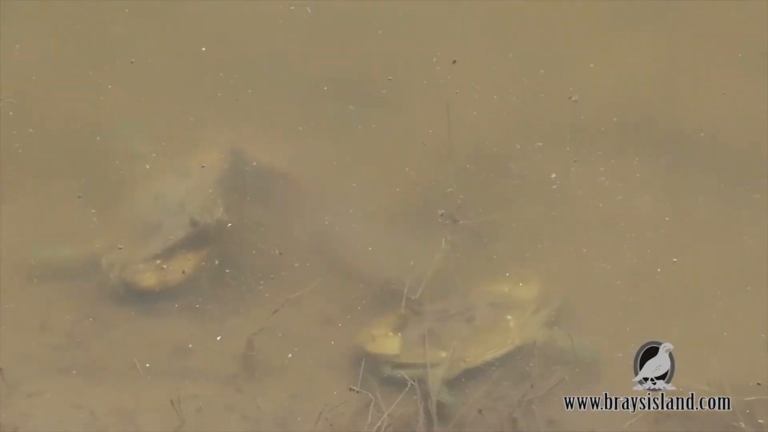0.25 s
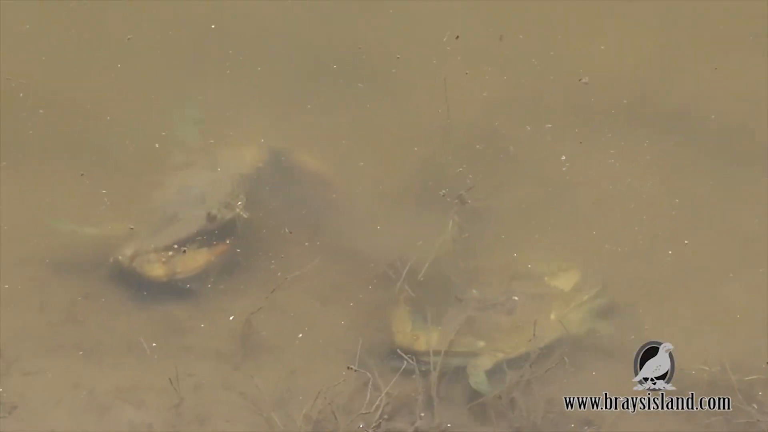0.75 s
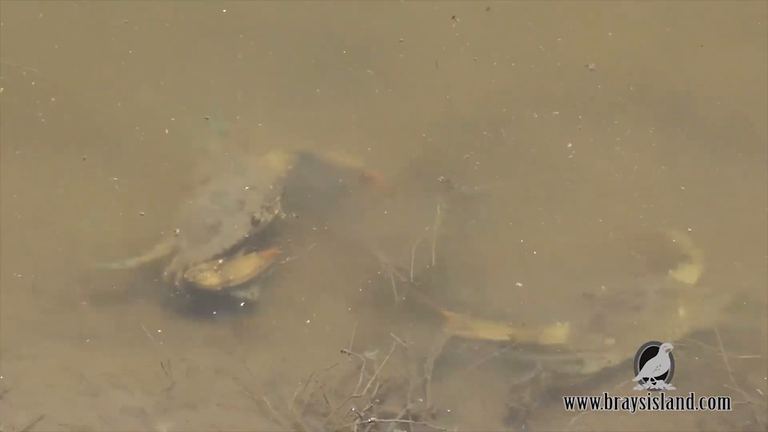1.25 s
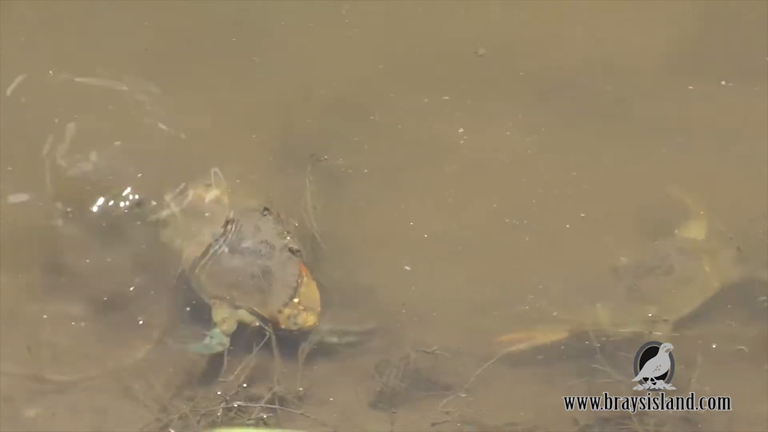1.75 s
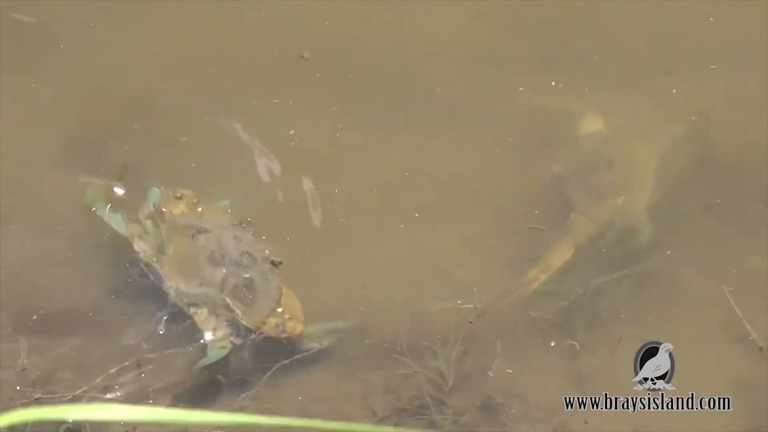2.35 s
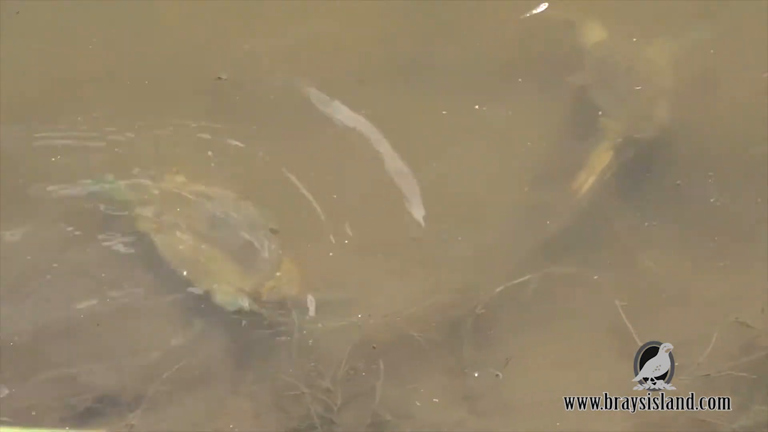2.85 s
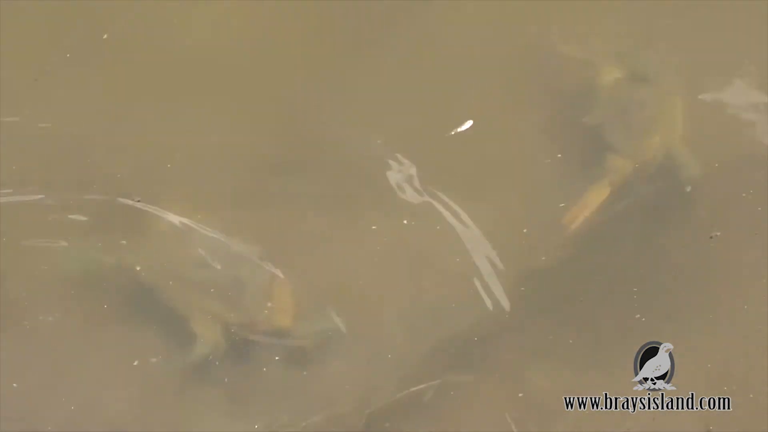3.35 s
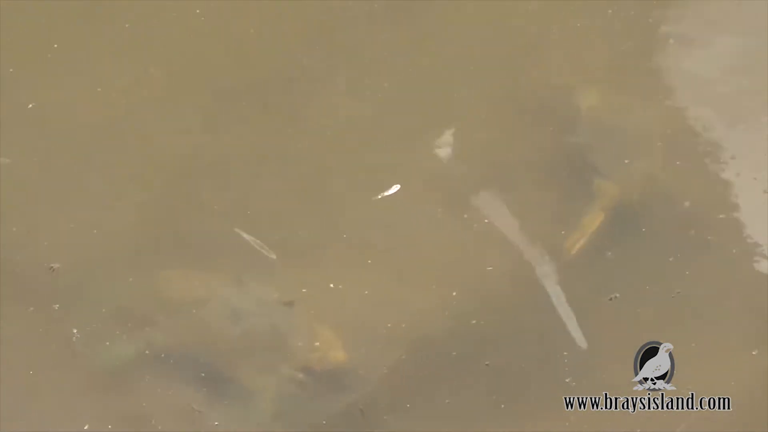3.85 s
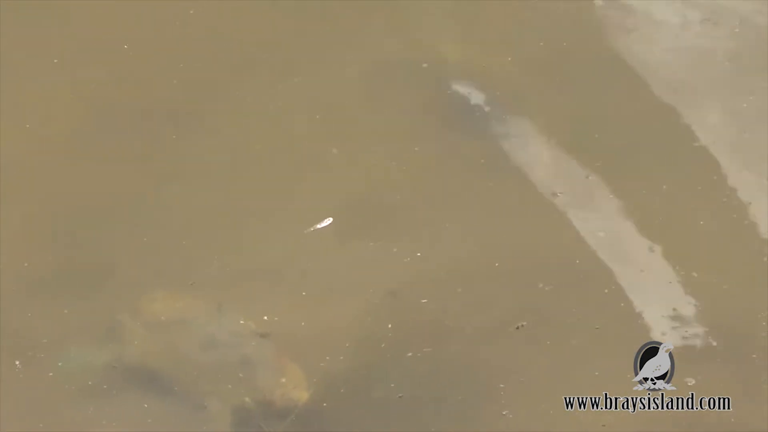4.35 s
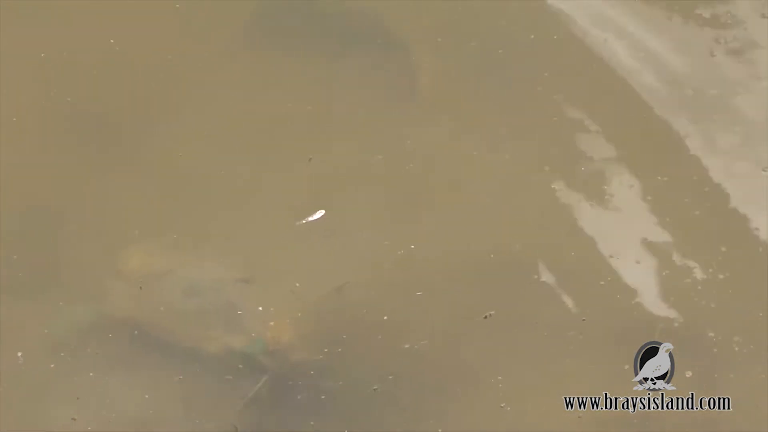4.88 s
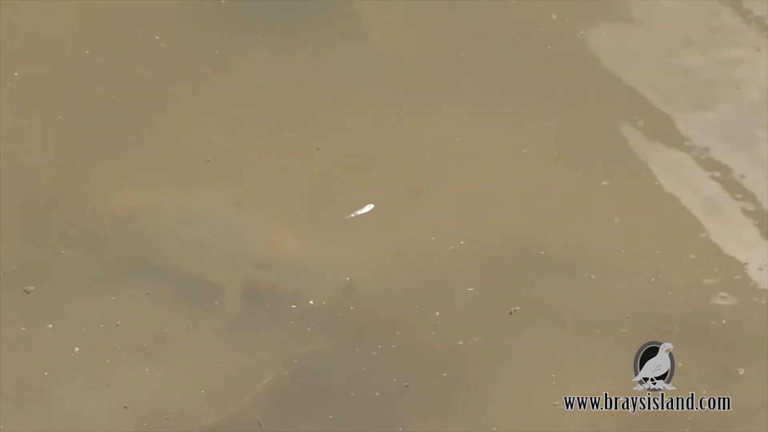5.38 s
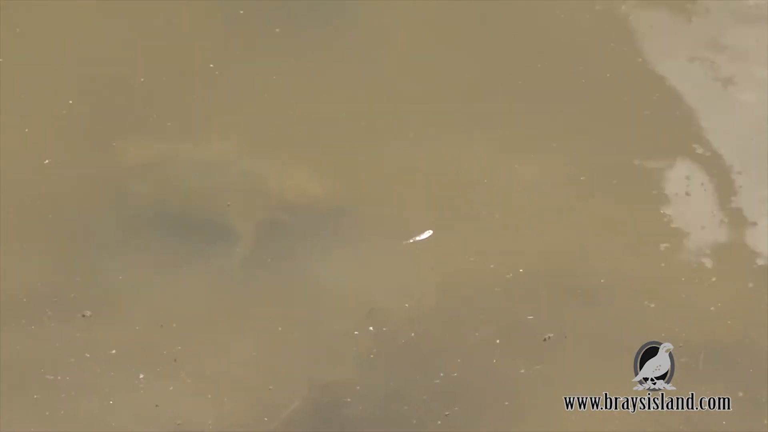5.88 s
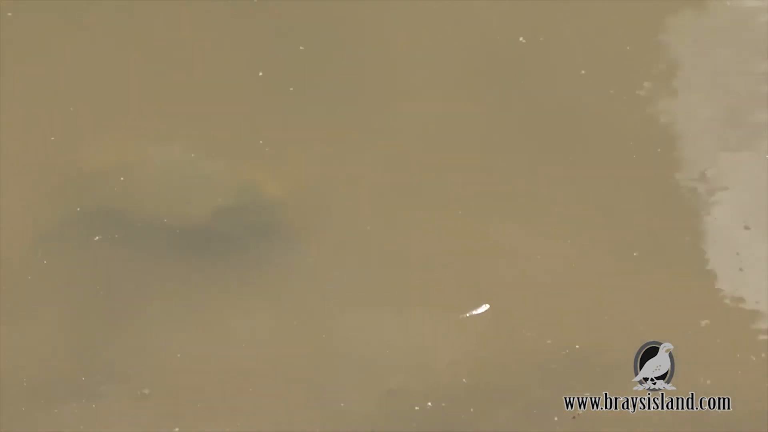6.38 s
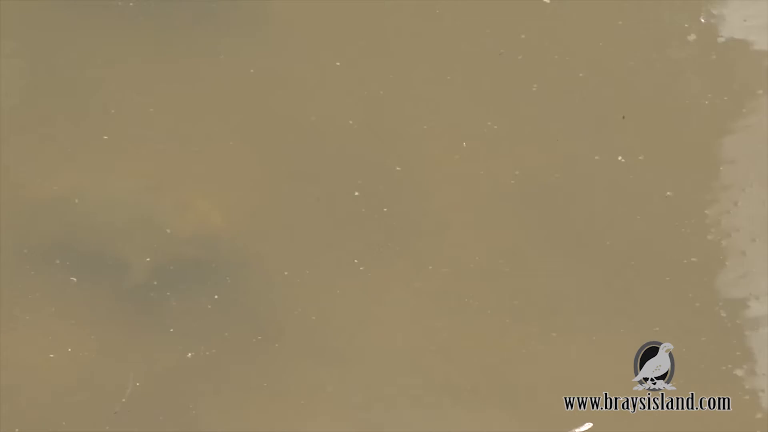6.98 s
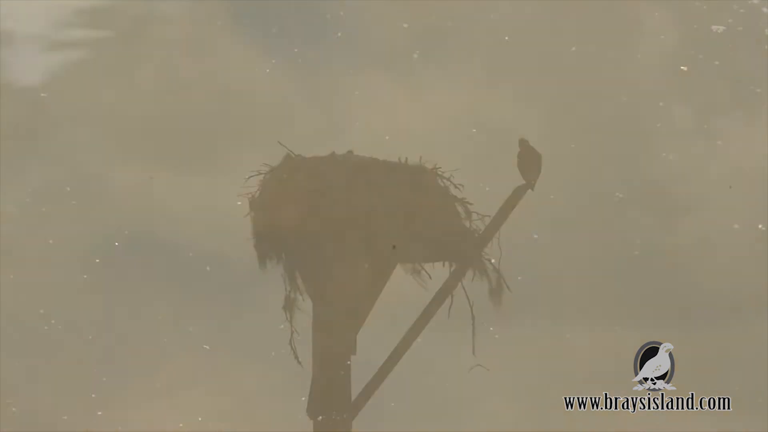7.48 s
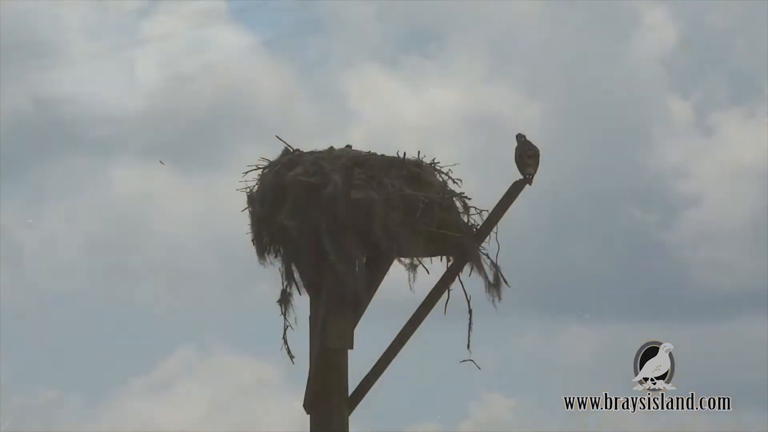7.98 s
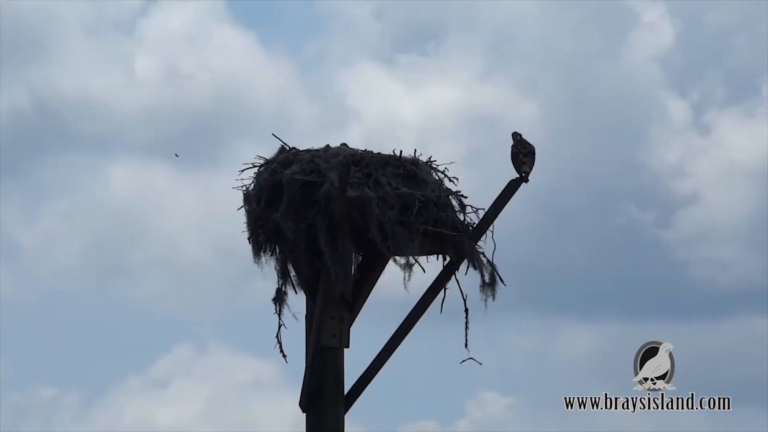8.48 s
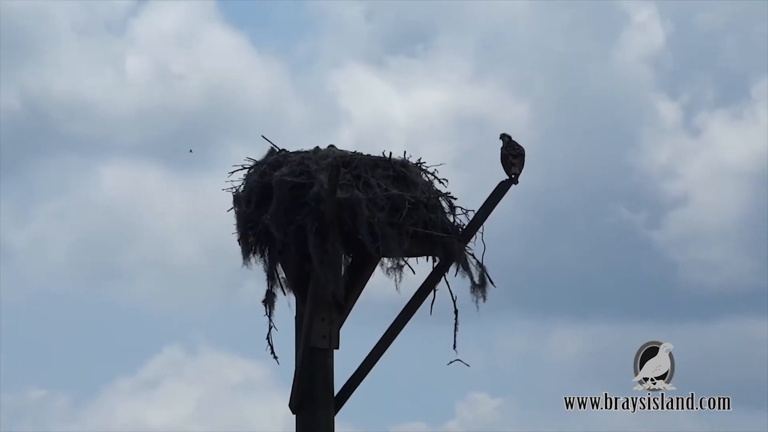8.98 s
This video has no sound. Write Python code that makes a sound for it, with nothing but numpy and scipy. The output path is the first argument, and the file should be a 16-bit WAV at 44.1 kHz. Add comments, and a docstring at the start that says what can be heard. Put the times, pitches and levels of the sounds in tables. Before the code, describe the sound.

Evenly spaced rasping bird squeaks sound beside a pond as wind thumps softly on the microphone, two snaps crack, and small birds whistle far off.

```python
"""Marsh bird beside a pond

A marsh bird repeats a short squeak of gliding partials that breaks into brief rough notes.
Small birds farther off whistle, warble and chirrup in near-pure tones, smeared by reeds and far banks.
Coloured noise makes the wind buffeting the microphone and the hush of open country; a cricket ticks
in fuzzy tone bursts, and something snaps twice, each time as quick cracks ringing short modes."""
import sys
import numpy as np
from scipy import signal
from scipy.io import wavfile
from scipy.ndimage import uniform_filter1d

SR = 44100
rng = np.random.default_rng(int(sys.argv[2]) if len(sys.argv) > 2 else 0)


def store_wav(level_fs):
    """Save 16-bit WAV to argv[1]."""
    pcm = np.round(np.clip(np.atleast_2d(level_fs), -1, 1) * 32767)
    wavfile.write(sys.argv[1], SR, pcm.T.astype(np.int16))


N = 407043


def amp(db):
    """Decibels to gain."""
    return 10 ** (np.asarray(db) / 20)


def add(mix, s, sound):
    """Mixes a sound in at s seconds."""
    part = mix[round(s * SR):][:len(sound)]
    part += sound[:len(part)]


def noise(points, size, patchy_db):
    """Random short-time spectra of the given colour, with drifting patches; rms 1."""
    frames, hz = 4 * N // size + 5, np.fft.rfftfreq(size, 1 / SR)
    real, imaginary, patches = rng.standard_normal((frames, len(hz), 3)).T
    patches = uniform_filter1d(patches, size=12, axis=0)  # across frequency
    patches = uniform_filter1d(patches, size=12, axis=1)  # across time
    point_hz, point_db = np.transpose(points)
    colour_db = np.interp(np.log(hz + 1), np.log(point_hz), point_db, left=-90, right=-90)
    level_db = colour_db[:, None] + patchy_db * patches / patches.std()
    spectra = (real + 1j * imaginary) * amp(level_db)
    x = signal.istft(spectra, nperseg=size, noverlap=3 * size // 4)[1][:N]
    return x / x.std()


def tone(hz, waver):
    """Running phase of a slightly unsteady pitch curve."""
    drift = uniform_filter1d(rng.standard_normal(len(hz)), size=60)
    return 2 * np.pi * (np.cumsum(hz * (1 + waver * drift)) / SR + rng.random())


def hiss():
    """Faint high noise, later set in opposite polarity in the two channels."""
    # Spectrum of the hiss. Each row: frequency in Hz, relative level in dB per Hz.
    hiss_colour = [(2350, -41), (4000, -15), (4440, -31), (5440, -5.5), (11600, 10), (16000, 5)]
    return amp(-64.5) * noise(hiss_colour, size=256, patchy_db=-1.5)


def hush():
    """The hush of open country: steady noise, strongest in the lows, with slight drifting patches."""
    # Spectrum of the open country. Each row: frequency in Hz, relative level in dB per Hz.
    hush_colour = [(71, -14), (120, -3.5), (150, -3), (196, -14), (241, -6.5), (341, -9.5), (418, -8.5),
                   (569, -13.5), (789, -14), (856, -15), (1790, -20), (2070, -22.5), (3820, -24),
                   (5870, -34.5), (16000, -39)]
    return amp(-31.5) * noise(hush_colour, size=1024, patchy_db=1.11)


def wind():
    """Low buffeting of air on the microphone, in lumps each surrounded by a lull."""
    # Spectrum of wind on the microphone. Each row: frequency in Hz, relative level in dB per Hz.
    wind_colour = [(11, -38), (18, -10), (70, 7.5), (81, 6), (102, -18), (146, -2), (194, -20), (220, -18),
                   (290, -55), (480, -120)]
    # The strongest buffets. Each row: centre in seconds, level in dB above the steady wind.
    buffets = [(.56, 7), (.68, 9.5), (1.18, 10), (1.52, 10.5), (2.43, 5.5), (3.85, 13), (4.5, 5.5),
               (4.68, 6), (5.01, 15), (5.22, 5), (5.45, 10), (5.7, 2), (6.16, 12.5), (6.71, 5.5),
               (7.22, 12.5), (7.58, 5), (8.55, 8.5), (8.72, 12), (9.2, 5)]
    wind_db, buffet_s, lull_share = -31, 0.028, 0.24
    t = np.arange(N) / SR
    lumps_db = np.zeros(N)
    for s, db in buffets:
        buffet = np.exp(-((t - s) / buffet_s) ** 2)
        lull = np.exp(-((t - s) / (3 * buffet_s)) ** 2)
        lumps_db += db * ((1 + lull_share) * buffet - lull_share * lull)
    return amp(wind_db + lumps_db) * noise(wind_colour, size=4096, patchy_db=2.0)


def cricket():
    """Short chirps near ten kilohertz, made fuzzy by an unsteady pitch."""
    # Start of each chirp in seconds.
    chirp_starts = [0.349, 0.904, 1.066, 1.249, 1.408, 1.584, 1.777, 1.98, 2.379, 2.551, 2.739, 2.959, 3.15,
                    3.35, 3.514, 3.705, 3.89, 4.29, 4.54, 4.93, 5.14, 5.41, 5.81, 6.02, 6.205, 6.41, 6.605]
    chirp_db, chirp_hz, chirp_s = -52, 9670, 0.033
    out, shape = np.zeros(N), np.hanning(round(chirp_s * SR))
    for s in chirp_starts:
        add(out, s, amp(chirp_db) * shape * np.sin(tone(chirp_hz + 0 * shape, .04)))
    return out


def banks(x):
    """Far banks and trees return a late, smeared echo."""
    t = np.arange(SR // 2) / SR
    rise = np.clip((t - .04) / 0.089, 0, 1)
    tail = rng.standard_normal(len(t)) * rise * amp(-60 * t / 1.6)  # falls 60 dB in 1.6 s
    return signal.fftconvolve(x, tail / np.linalg.norm(tail))[:N]


def reeds(x):
    """Reeds scatter the far song into a short smear behind the direct sound."""
    blur_s, blur_db = 0.027, -4
    t = np.arange(round(4 * blur_s * SR)) / SR
    trail = rng.standard_normal(len(t)) * np.exp(-t / blur_s)
    return x + amp(blur_db) * signal.fftconvolve(x, trail / np.linalg.norm(trail))[:N]


def whistle(hz, waver, edge_s):
    """A near-pure tone along a pitch curve; distant song comes and goes on the air."""
    flutter_db = 2.5
    t = np.arange(len(hz)) / SR
    flutter = uniform_filter1d(rng.standard_normal(len(hz)), size=400) * np.sqrt(400)
    ends = np.minimum(np.minimum(t, t[::-1]) / edge_s, 1)
    return np.sqrt(2) * np.sin(tone(hz, waver)) * ends * amp(flutter_db * flutter)


def rising_whistles():
    """Far whistles climb ever faster and may flick up in the last moment, louder the wider the flick."""
    # Two voices at a time. Each row: start in seconds, length in seconds, first pitch in Hz,
    # last pitch before the upturn in Hz, final upturn in Hz, level before flick and flutter in dB.
    whistle_rows = [(1.868, 0.066, 1520, 2480, 10, -37), (1.887, 0.11, 1615, 2880, 10, -43),
                    (2.428, 0.043, 1594, 2320, 10, -39), (2.45, .08, 1620, 2620, 11, -39),
                    (7.79, 0.1, 1690, 3030, 1500, -37.5), (7.82, 0.06, 1600, 2300, 10, -44),
                    (8.028, .15, 1516, 3050, 1330, -35), (8.086, 0.13, 1565, 2990, 10, -40.5),
                    (8.31, .13, 1410, 3005, 1160, -34), (8.398, 0.053, 2099, 2756, 10, -40)]
    rise_power, flick_s, flick_db_per_hz = 1.7, 0.0153, .006
    out = np.zeros(N)
    for s, length, first_hz, last_hz, upturn_hz, db in whistle_rows:
        u = np.linspace(0, 1, round(length * SR))
        flick = np.clip(1 - (1 - u) * length / flick_s, 0, 1)
        hz = first_hz + (last_hz - first_hz) * u ** rise_power + upturn_hz * flick ** 2
        swell = np.sin(np.pi * u ** 0.86 * .85) ** 0.4
        level = amp(db + flick_db_per_hz * upturn_hz * flick)
        add(out, s, level * swell * whistle(hz, 0.093, 0.0015))
    return out


def arched_calls(rows, waver, voices):
    """Near-pure tones whose pitch arches between its ends, in voices of (pitch ratio, level in dB)."""
    out = np.zeros(N)
    for s, length, first_hz, last_hz, arch_hz, db in rows:
        u = np.linspace(0, 1, round((length + 0.0062) * SR))  # room for the soft ends
        hz = first_hz + (last_hz - first_hz) * u + arch_hz * np.sin(np.pi * u)
        for ratio, voice_db in voices:
            add(out, s - .004, amp(db + voice_db) * whistle(ratio * hz, waver, 0.0051))
    return out


def warbles():
    """Warbles and chips of small far birds: one arched voice, its pitch only slightly unsteady."""
    # Each row: nominal start and length in seconds, then first pitch, last pitch and arch in Hz
    # (all sung at 0.98 of these), level before flutter in dB.
    warble_rows = [(2.04, 0.046, 4166, 4000, -150, -45), (2.28, 0.107, 4150, 4000, -250, -48),
                   (2.535, 0.079, 3740, 3900, 407, -42.5), (2.62, 0.073, 3990, 3897, 12, -42),
                   (2.87, 0.091, 3820, 3300, 26, -45), (3.0, .08, 3370, 4130, 194, -39),
                   (3.28, 0.12, 3500, 4120, 497, -44.5), (3.25, 0.17, 7200, 6300, -100, -55),
                   (3.74, 0.22, 7230, 6950, -200, -59), (4.26, 0.13, 7500, 7100, -400, -54.5),
                   (4.38, .012, 6300, 5270, 15, -52), (5.995, .015, 6000, 4830, 10, -46),
                   (8.865, .055, 4300, 3980, 300, -57), (9.158, 0.027, 4120, 4100, -250, -43),
                   (9.2, .028, 4600, 4000, 8, -47), (4.816, 0.024, 6438, 3940, 5, -44),
                   (6.822, 0.0097, 3070, 2700, 10, -30.5), (6.92, .012, 3050, 2940, 10, -40),
                   (7.038, 0.011, 3070, 2880, 18, -35), (3.432, .012, 2880, 2770, 10, -40),
                   (3.532, .014, 2820, 2730, 10, -38), (5.378, 0.011, 3160, 3050, 10, -39)]
    return arched_calls(warble_rows, .16, [(0.98, 0.007)])


def chirrups():
    """Arched chirrups in two voices, raspy through their very unsteady pitch."""
    # Each row: nominal start and length in seconds, then first pitch, last pitch and arch of the
    # upper voice in Hz, its level before flutter in dB.
    chirrup_rows = [(0.074, 0.018, 3240, 3060, 1115, -35.5), (2.255, 0.0236, 3250, 3980, 700, -37),
                    (4.612, 0.035, 3300, 4230, 590, -39), (4.684, 0.0265, 3170, 3940, 740, -31)]
    return arched_calls(chirrup_rows, .52, [(1, 0), (.7, -6)])


def snaps():
    """A few quick cracks in a row ring short, damped modes."""
    # Each row: start in seconds, peak level ahead of the recorder in dB.
    snap_rows = [(2.2035, .5), (2.817, -13)]
    # Ringing modes of a crack. Each row: frequency in Hz, width in Hz, relative level in dB.
    modes = [(2660, 280, -16), (3700, 830, 18), (5080, 600, 13), (5730, 480, 4), (6280, 330, 9.5),
             (9700, 720, 7.5), (12400, 570, -1), (15300, 800, -4)]
    out, ring, t = np.zeros(N), np.zeros(800), np.arange(800) / SR
    for k, (hz, width, db) in enumerate(modes):
        ring += (-1) ** k * amp(db) * np.sin(2 * np.pi * hz * t) * np.exp(-np.pi * width * t)
    ring *= np.minimum(t / 0.00014, 1)  # quick onset
    for s, db in snap_rows:
        snap = np.zeros(1200)
        for delay, crack_db in ((.0004, 22), (.0011, 16), (.0021, 21.5), (.003, 10)):
            add(snap, delay, amp(crack_db) * ring)
        add(out, s, amp(db) * snap / abs(snap).max())
    return out


def note(length, first_hz, last_hz, levels, peak, edge, top_db, waver, rasp_db):
    """One swelling note of gliding partials, roughened by breathy noise."""
    top_hz = 4030  # partials fade by top_db per kHz above this
    upper_fade_db = -7.5  # partials above the strongest die away through the note
    u = np.linspace(0, 1, round((abs(length) + 0.0046) * SR))
    hz, strongest = first_hz + (last_hz - first_hz) * u, np.argmax(levels)
    phase = tone(hz, waver)
    partials = np.zeros(len(u))
    for k, db in enumerate(levels):
        over_khz = np.maximum((k + 1) * hz - top_hz, 0) / 1000
        partial_db = db - top_db * over_khz + upper_fade_db * u * (k > strongest)
        partials += amp(partial_db) * np.cos((k + 1) * phase)
    rasp = np.convolve(rng.standard_normal(len(u)), np.hanning(50), "same")
    rasp /= np.sqrt(50 * 3 / 8)  # rms about 1
    swell = abs(np.sin(np.pi * u ** peak)) ** edge  # peak: how late it swells; edge: how soft its ends
    return np.sqrt(2) * partials * (1 + amp(rasp_db) * rasp) * swell


def squeak_glides():
    """Each squeak opens with a faint, higher catch and then a rising glide, second partial over a weak first."""
    # Each row: nominal start and length in seconds, first pitch in Hz, last pitch in Hz,
    # level of the second partial in dB, slope of the upper partials in dB per partial.
    glides = [(1.414, .035, 983, 1110, -25, -1.5), (2.161, 0.036, 922, 1150, -23.5, -1.5),
              (2.646, 0.028, 895, 1165, -20, -4.5), (3.1, 0.032, 890, 1140, -16.7, -3),
              (3.628, 0.026, 850, 1170, -14, -4), (4.072, 0.028, 874, 1138, -13, -9.5),
              (4.538, 0.027, 895, 1103, -22.5, -6), (5.025, 0.032, 858, 1146, -16, -4),
              (5.465, 0.0226, 839, 1090, -15.5, -9), (5.911, .025, 830, 1102, -16.5, -6.5),
              (6.329, 0.012, 907, 1030, -19, -26), (6.749, 0.012, 783, 1046, -20, -7.5),
              (7.141, 0.017, 774, 1056, -19.5, -7), (7.562, 0.026, 838, 1150, -15, -6.5),
              (7.967, 0.015, 790, 1080, -17, -10), (8.37, 0.023, 829, 1084, -12.5, -5),
              (8.781, 0.0207, 796, 1050, -14, -6.5), (9.221, 0.013, 758, 964, -18.5, -7)]
    lead_s, lead_db = .008, -12
    out = np.zeros(N)
    for s, length, first_hz, last_hz, db, slope_db in glides:
        lead_levels = [db + lead_db - 6, db + lead_db]
        lead = note(lead_s, 1.4 * first_hz, 1.3 * first_hz, lead_levels,
                    peak=0.52, edge=1, top_db=0, waver=0.44, rasp_db=-2.5)
        add(out, s - lead_s, lead)
        levels = [db - 13] + [db + k * slope_db for k in range(4)]
        glide = note(length - .0015, first_hz, last_hz, levels,
                     peak=2.17, edge=0.23, top_db=43, waver=0.15, rasp_db=-38)
        add(out, s - .003, glide)
    return out


def squeak_breaks():
    """The squeak breaks into short notes in two registers, the shorter the rougher."""
    # Each row: nominal start and length in seconds, middle pitch in Hz,
    # level of the main partial in dB, side partials relative to it in dB.
    breaks = [(1.461, 0.004, 930, -33, -11), (2.67, 0.01, 913, -20, -12), (2.687, .005, 886, -23.5, -12),
              (2.69, .0057, 1100, -22.5, -25), (2.712, 0.0075, 1050, -23.5, -8.5),
              (3.128, 0.0096, 920, -12, -10), (3.145, 0.01, 1007, -20, -0.5),
              (3.172, 0.0062, 1030, -20.5, -5.5), (3.658, .01, 1054, -15.5, -12),
              (3.668, 0.011, 1050, -16.5, -7), (3.695, 0.0047, 910, -22.5, -3),
              (4.101, 0.0085, 1080, -19, -24), (4.111, .012, 1062, -16.5, -18),
              (4.14, 0.0047, 1100, -22, -14), (4.568, .007, 895, -26.5, -11),
              (4.58, 0.01, 1080, -23.5, -14), (4.59, 0.0036, 1053, -25, -12),
              (4.606, .0055, 877, -29.5, -2), (4.61, 0.0083, 1040, -32, -4),
              (5.058, 0.0053, 975, -24.5, 0.5), (5.069, .012, 1067, -17.5, -10),
              (5.096, 0.004, 893, -23.5, -1), (5.486, .014, 886, -15.5, -11), (5.508, 0.0086, 912, -23, -8),
              (5.512, 0.0039, 1010, -26, -8), (5.934, 0.015, 888, -13, -11),
              (5.959, 0.0057, 874, -17.5, -11), (6.343, .015, 842, -18.5, -28),
              (6.759, 0.017, 838, -22.5, -23), (7.15, 0.024, 852, -15, -7), (7.589, 0.005, 907, -18, -7),
              (7.606, 0.0049, 865, -19, -5), (7.979, 0.02, 870, -18.5, -5), (8.39, 0.011, 880, -14, -6.5),
              (8.414, 0.0045, 850, -22, -9), (8.796, 0.021, 852, -10, -11), (8.83, 0.0045, 825, -20.5, -14)]
    register_hz = 965  # below it a note sings on its third partial, otherwise on its second
    fundamental_db, sixth_db = -13, -25
    out = np.zeros(N)
    for s, length, hz, db, side_db in breaks:
        if hz < register_hz:
            slide = 3800  # Hz per second of nominal length
            levels = [db + fundamental_db - 14, db + side_db - 8, db,
                      db + side_db, db + side_db - 34, db + sixth_db]
        else:
            slide = -3000
            levels = [db + fundamental_db, db, db + side_db, db + 1.76 * side_db]
        half = slide * length / 2
        broken = note(length, hz - half, hz + half, levels,
                      peak=0.87, edge=0.72, top_db=0, waver=0.18, rasp_db=-2.5 - 1100 * length)
        add(out, s - .0015, broken)
    return out


def scene():
    """One microphone feeds both channels; only a faint hiss differs."""
    far_birds = reeds(rising_whistles() + warbles() + chirrups())
    birds = squeak_glides() + squeak_breaks() + far_birds
    mid = birds + amp(-24.5) * banks(birds) + snaps() + cricket() + wind() + hush()
    side = hiss()
    return np.array([mid + side, mid - side])


def record(dry):
    """Gain control ducks just after loud peaks and recovers; then the treble is cut off at the band limit."""
    peak_db = 20 * np.log10(abs(dry).max(0) + 1e-9)
    fall = np.arange(N) * 60. / SR  # the held peak falls 60 dB a second
    held_db = np.maximum.accumulate(peak_db + fall) - fall
    over_db = np.maximum(held_db + 7.0, 0)  # threshold at -7 dB
    late_db = signal.lfilter(np.ones(200) / 200, 1, over_db)  # averaged over the last 200 samples
    ducked = dry / amp(1.1 * late_db)
    band_limit = signal.firwin(511, 15850, window=("kaiser", 9), fs=SR)
    return signal.oaconvolve(ducked, band_limit[None], "same")


dry = scene()
out = record(dry)
store_wav(out)
```